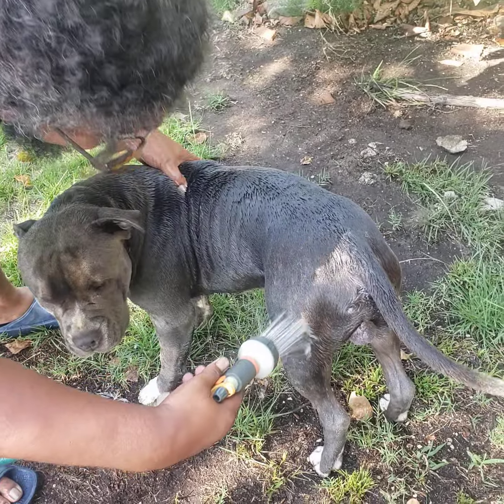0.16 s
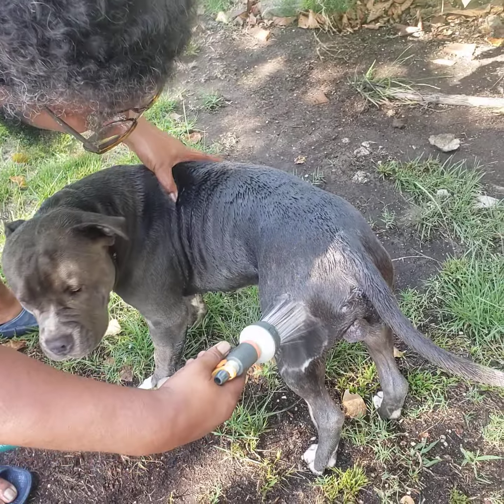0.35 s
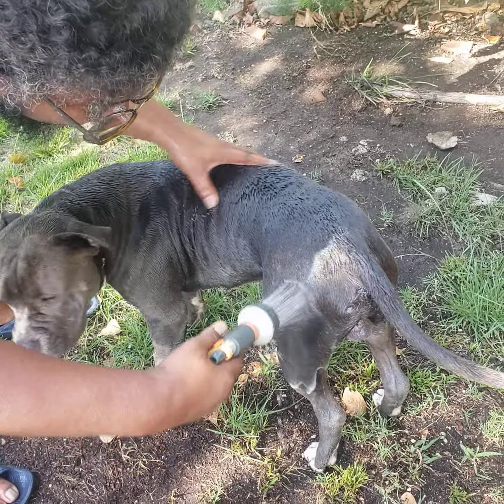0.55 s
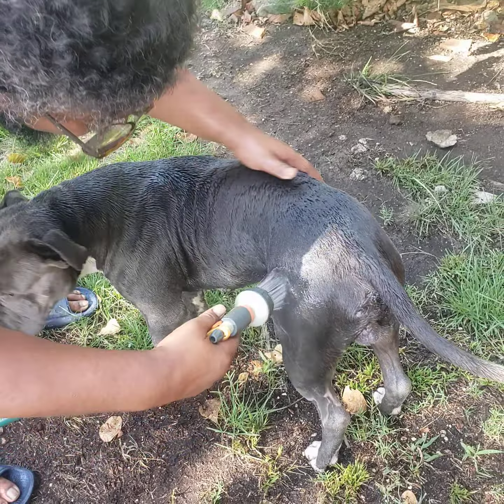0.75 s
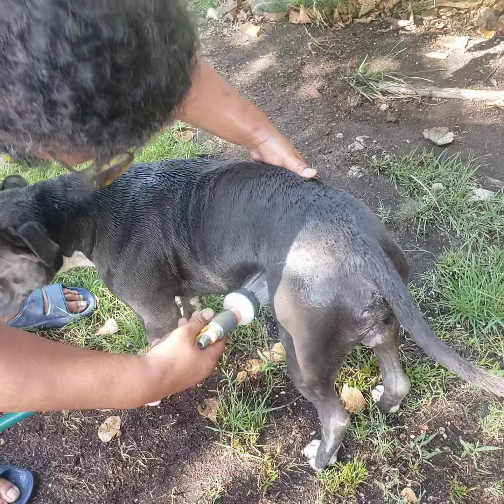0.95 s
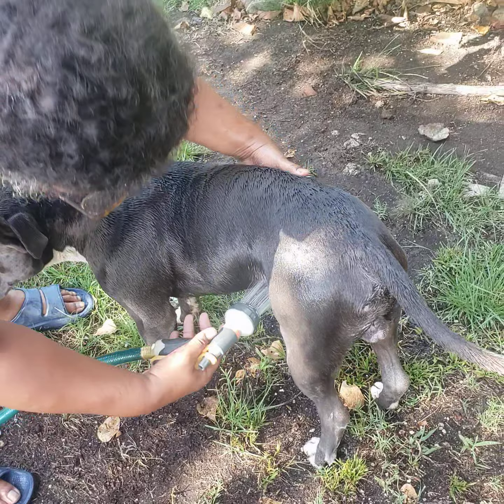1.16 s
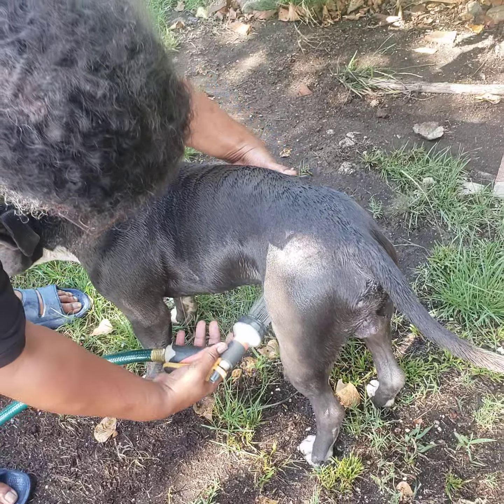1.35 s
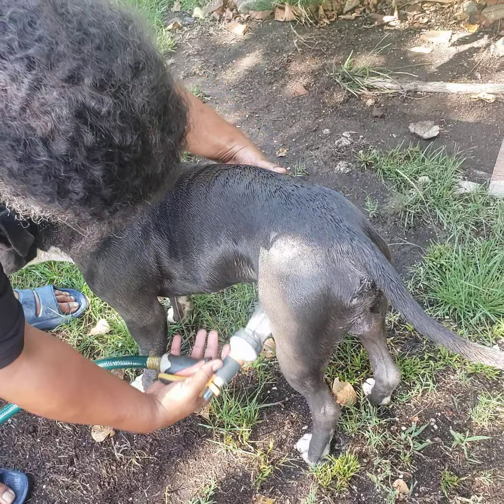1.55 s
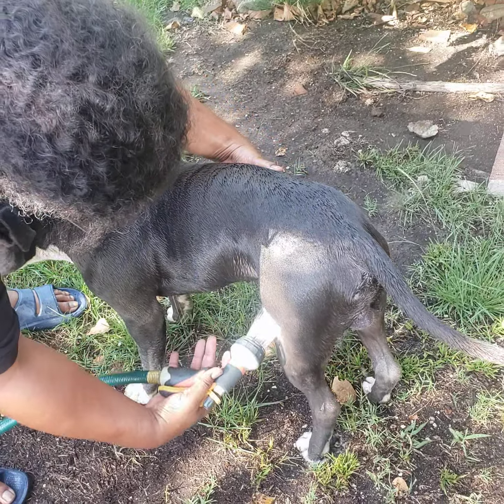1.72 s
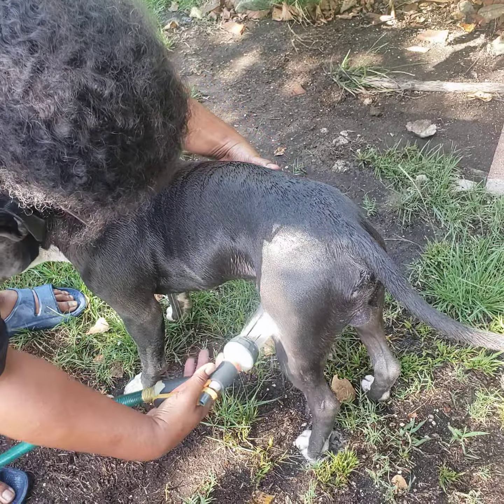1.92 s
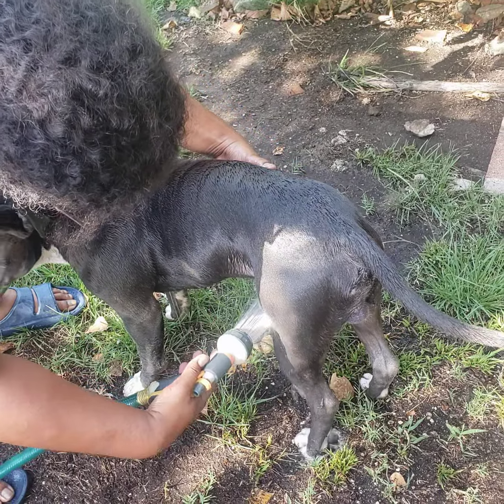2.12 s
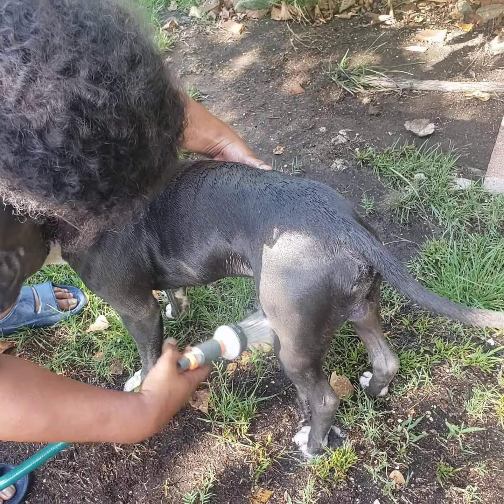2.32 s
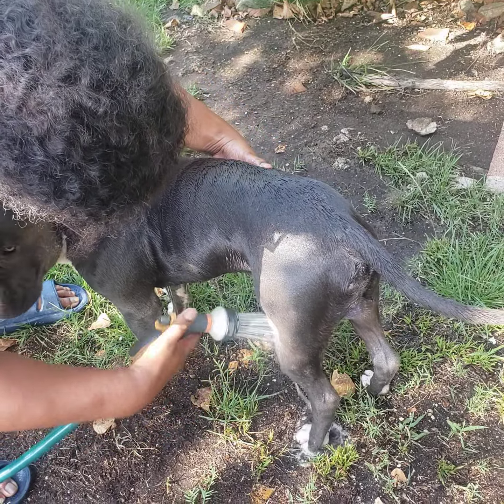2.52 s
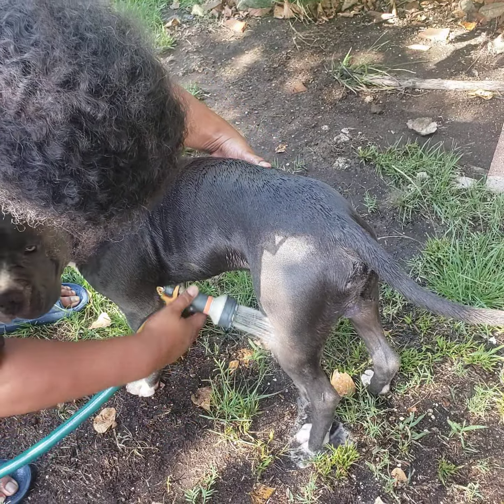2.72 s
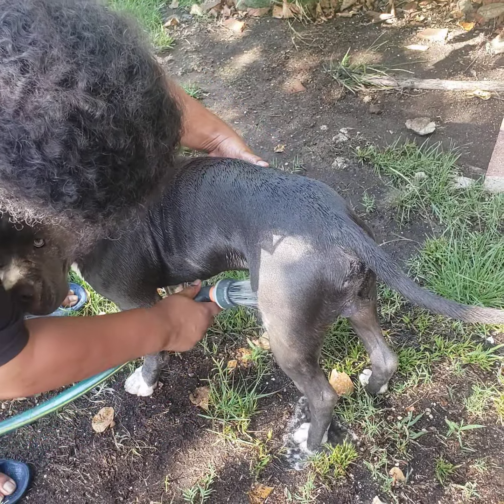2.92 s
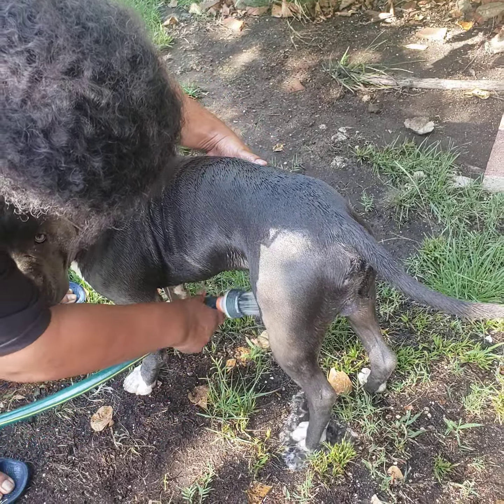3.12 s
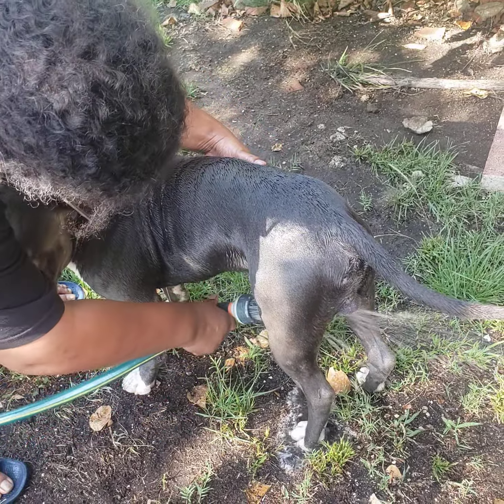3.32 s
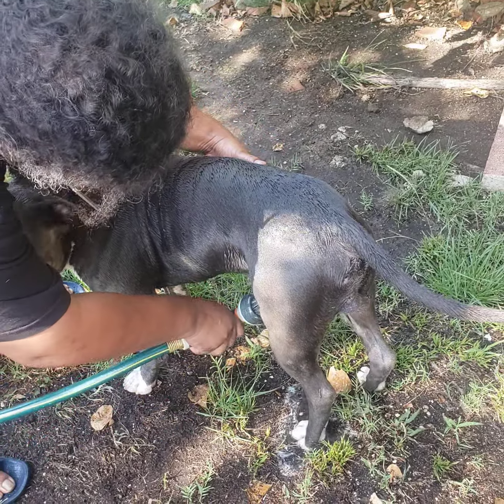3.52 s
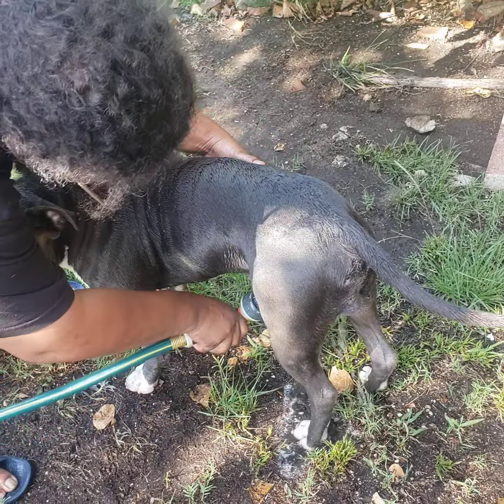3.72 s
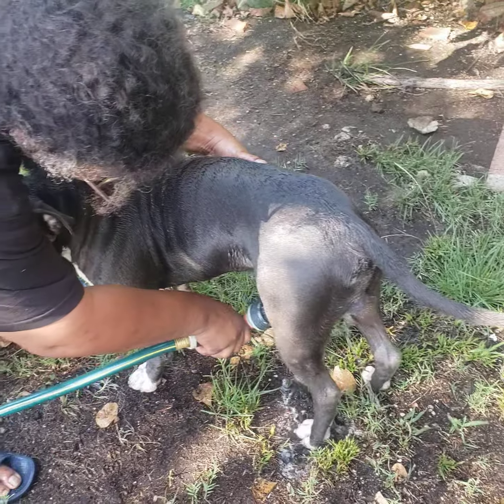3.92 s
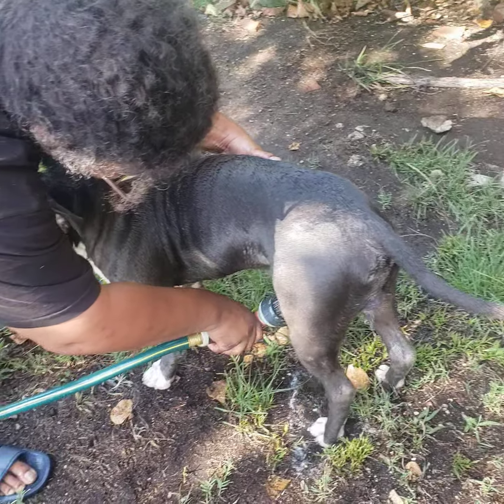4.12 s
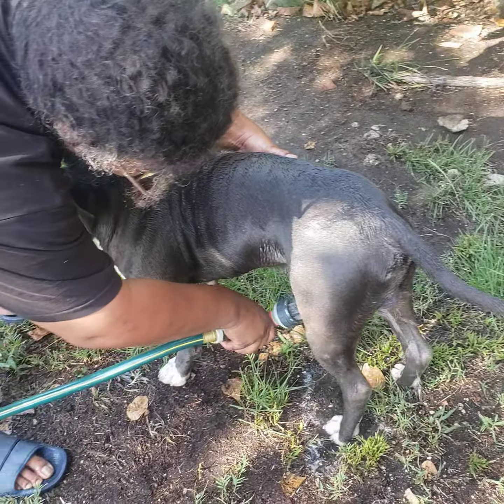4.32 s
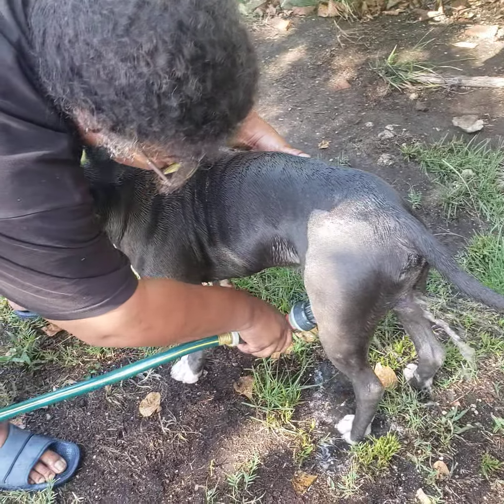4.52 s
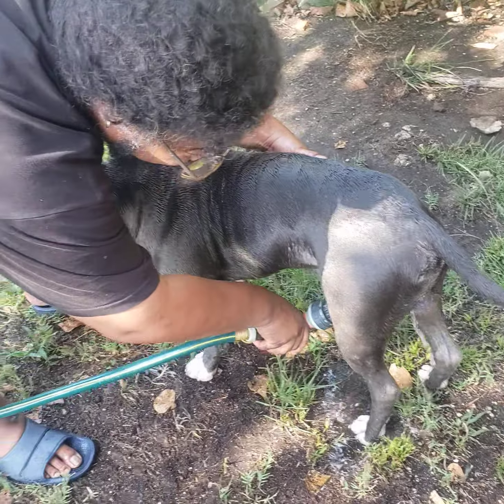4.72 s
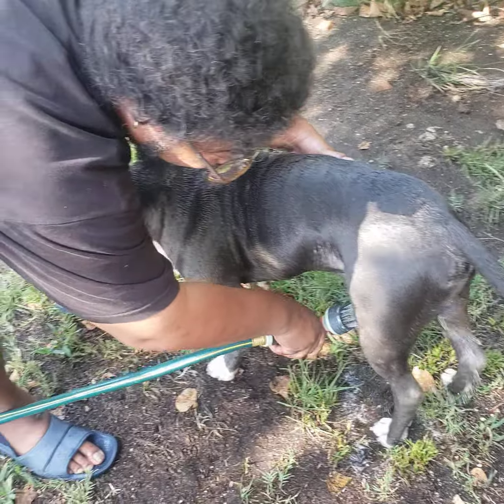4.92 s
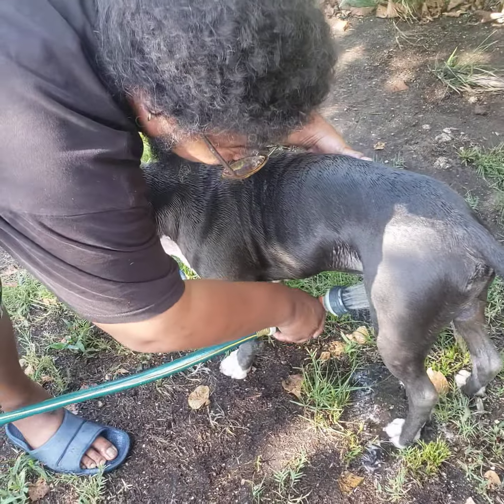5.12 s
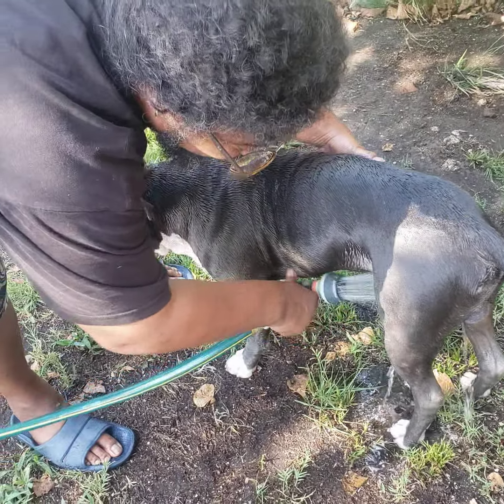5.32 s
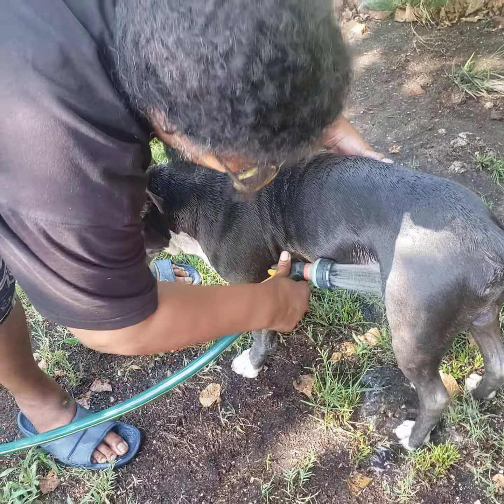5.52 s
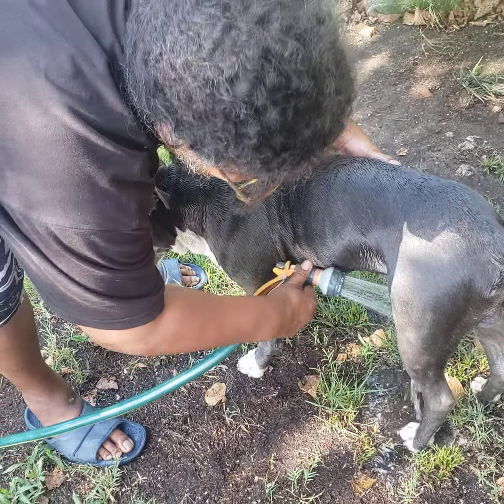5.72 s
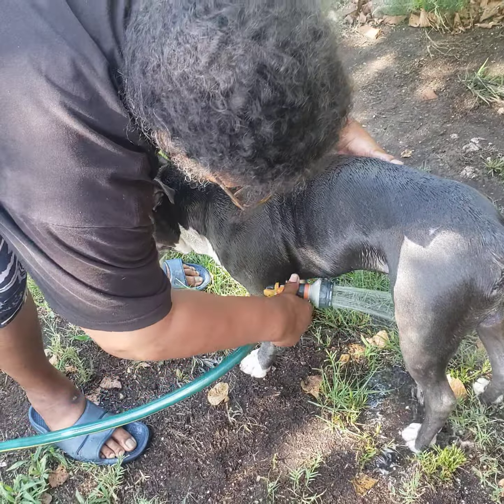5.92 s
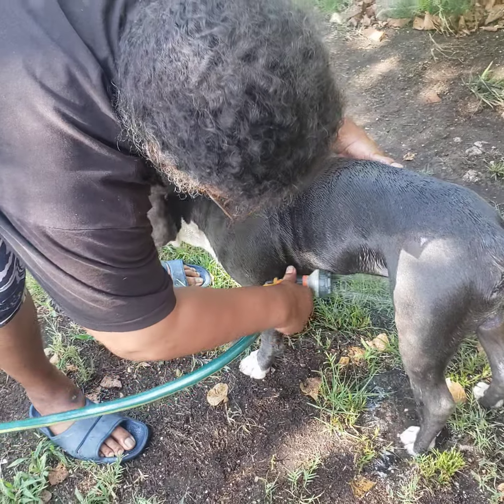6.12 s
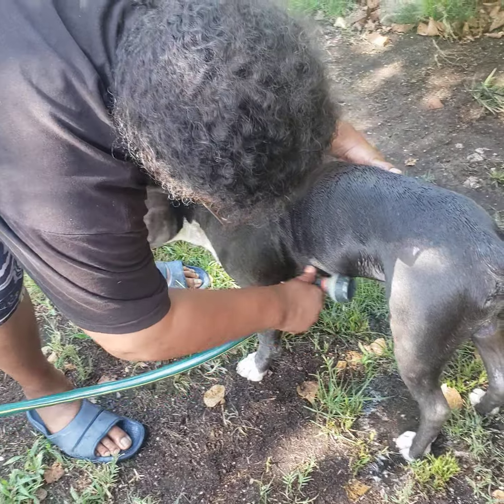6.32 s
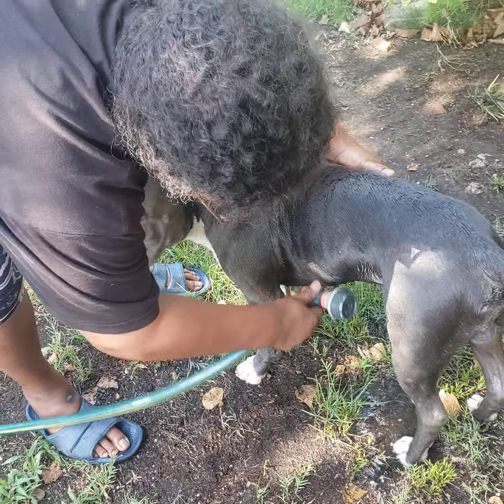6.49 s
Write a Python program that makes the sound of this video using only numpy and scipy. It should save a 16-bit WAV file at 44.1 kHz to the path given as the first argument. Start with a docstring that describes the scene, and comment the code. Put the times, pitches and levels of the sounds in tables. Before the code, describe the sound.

A garden hose nozzle sprays a dog in a yard, heard from about a metre above. Fine jets make a bright, steady hiss while drops splash on the wet coat and run-off patters on the soil. The spray swells and spits early on, eases, then builds a little again. Near the end the valve gives a brief squeak as it shuts and the hiss dies away. A faint low outdoor rumble lies underneath.

```python
"""A dog is rinsed with a garden nozzle in a yard; a two-port microphone is about a metre above it.
Fine jets sizzle from the start, and drops splash and drum on the wet coat over a low outdoor rumble.
Near 1.5 s the aim closes on the flank: the spray swells, the nozzle spits, run-off patters on the soil.
The spray eases by 3 s and builds again around 5 s. Just after 6 s the trigger is let go:
the valve's seal squeals briefly as it shuts, the hiss dies away and the hose gives a soft jolt."""
import sys
import numpy as np
from scipy import signal
from scipy.fft import rfft, irfft, next_fast_len
from scipy.io import wavfile
from scipy.ndimage import uniform_filter1d, map_coordinates

SR = 44100
rng = np.random.default_rng(int(sys.argv[2]) if len(sys.argv) > 2 else 0)


def put_to_file(sound):
    """Save the sound as 16-bit audio at rate SR, in the file named by the first command-line argument."""
    columns = np.atleast_2d(sound).T  # one column per channel
    safe = np.clip(columns, -1, 1)
    whole_steps = np.round(safe * 32767)
    wavfile.write(sys.argv[1], SR, whole_steps.astype(np.int16))


N = 289031
T = np.arange(N) / SR
SIZE = next_fast_len(N, real=True)
FREQS = np.maximum(np.arange(SIZE // 2 + 1) * SR / SIZE, 1)

# low outdoor rumble in the yard: time_s, level_db
RUMBLE_LEVELS = [(0, -54), (1.8, -55), (2.8, -54), (3.9, -55.5), (5.0, -51), (5.5, -51), (6.55, -53)]
# run-off on the soil below the dog: time_s, level_db
RUN_OFF_LEVELS = [(0.0, -76.5), (1.75, -64), (3.21, -73), (4.82, -68.5), (4.94, -59.5), (5.16, -64.5),
                  (5.8, -60.5), (6.55, -71)]
# heavy water hitting the flank: time_s, level_db
SPATTER_LEVELS = [(0, -76.5), (0.4, -68.5), (0.88, -68), (1.1, -81.5), (1.3, -93), (1.42, -63),
                  (1.58, -50.5), (1.88, -50), (2.25, -52.5), (2.55, -63.5), (2.9, -60.5), (3.1, -71),
                  (3.5, -78), (3.62, -68.5), (4.3, -70.5), (5.15, -68.5), (5.38, -59), (5.79, -63.5),
                  (5.93, -78.5), (6.05, -72)]
# the spray, louder as the aim nears the flank: time_s, mist_db, splash_db
SPRAY_LEVELS = [(0.0, -42.5, -55.5), (0.35, -41, -50), (0.6, -41.5, -54), (0.7, -45, -54.5),
                (1.18, -44.5, -52.5), (1.35, -42, -49), (1.5, -33, -40), (1.58, -28, -40),
                (1.68, -30.5, -39.5), (1.79, -30, -38.5), (1.88, -31, -38.5), (2.06, -35, -50),
                (2.18, -35.5, -46), (2.42, -38.5, -47.5), (2.55, -41.5, -50.5), (2.74, -43, -52),
                (2.88, -42, -49.5), (3.0, -43, -53.5), (3.22, -45, -56.5), (3.58, -45, -57.5),
                (4.05, -46.5, -56.5), (4.3, -44.5, -53.5), (5.3, -41, -45.5), (5.5, -38.5, -47),
                (5.76, -41.5, -47.5), (5.9, -44, -52.5), (6.12, -47.5, -53)]
# the jets' sizzle, changing with the aim: time_s, centre_hz, offset_from_mist_db
SIZZLE_BAND = [(0, 11800, 1), (0.55, 11960, 2), (0.92, 12200, 3), (1.25, 11800, -8), (1.85, 11740, -1),
               (2.1, 11960, -5.5), (2.35, 11540, -0.5), (2.48, 11600, -7), (2.62, 11470, 2.5),
               (2.8, 11300, -1.5), (3.1, 11900, -12.5), (4.1, 12000, -2.5), (4.4, 12200, -11),
               (4.9, 11100, -13), (5.1, 11960, 1.5), (5.4, 11860, 2), (5.6, 12030, 6), (5.76, 11900, 5),
               (5.85, 11760, 2), (6.0, 12000, 6), (6.12, 11800, 3)]
# the nozzle sweeps close past the leg and the gap rings out:
# time_s, rise_s, fall_s, centre_hz, glide_hz_per_s, width_hz, offset_from_splash_db
CLOSE_PASSES = [(1.47, 0.12, 0.23, 5030, 400, 706, -1), (1.8, 0.25, 0.36, 1770, -200, 750, -12.5),
                (2.2, 0.38, 0.31, 5180, -200, 1500, -2), (2.17, 0.44, 0.36, 1350, -130, 360, -11.5),
                (2.52, 0.043, 0.045, 4060, 0, 330, -0.5), (2.68, 0.13, 0.043, 4210, -2400, 617, 6),
                (2.69, 0.12, 0.12, 5520, 2200, 800, 1), (3.4, 0.13, 0.14, 4750, 0, 560, -7.5),
                (3.95, 0.25, 0.49, 4900, 0, 650, -5), (4.98, 0.39, 0.05, 4420, 0, 695, -7.5)]
# the jets playing on the soft body: start_s, end_s, first_pitch_hz, level_db
THRUMS = [(0.26, 1.55, 189.2, -61.5), (5.2, 6.063, 175, -62.5)]
# the body's resonances: pitch_multiple, gain_db
BODY_MODES = [(1, -1), (1.62, -7)]

# single fat splats on the coat: start_s, level_db, pitch_hz
SPLATS = [(0.445, -47, 2570), (1.3895, -54, 2930), (2.3252, -51, 2400), (2.469, -47, 2180),
          (2.662, -49, 3300), (2.9097, -44, 2300), (3.595, -53, 2800), (4.1351, -38.5, 3000),
          (4.1829, -45.5, 3230), (4.7617, -41.5, 2540), (5.3334, -46, 2280), (5.4347, -54, 2100)]
# short wet bursts: start_s, level_db
SOIL_SLAPS = [(1.91, -62), (2.215, -47), (2.299, -47), (2.494, -45), (4.923, -45.5), (5.434, -47)]
BRIGHT_DRIPS = [(5.5777, -31), (5.8094, -41), (5.917, -39.5), (6.4797, -58)]
NOZZLE_SPITS = [(1.558, -22), (1.8613, -24), (1.9107, -28), (2.1187, -31), (2.2654, -31), (6.452, -54)]

# flow noise in the valve, swelling as it narrows: time_s, level_db, pitch_hz
VALVE_FLOW = [(0, -69.5, 896), (2.0, -91, 855), (2.9, -69.5, 756), (4.3, -64, 881), (5.5, -62, 913),
              (6.0, -86, 890), (6.26, -60, 850), (6.35, -71, 865)]
# the valve's resonances: pitch_multiple, width_hz, gain_db
VALVE_MODES = [(1.003, 198, -1.5), (1.96, 260, -10)]
# the squeal's partials: harmonic, gain_db, growth_db_per_db, left_minus_right_db, left_lead_rad
SQUEAL_PARTIALS = [(1, 0, 1.05, -8, 0), (2, -6, 1.5, -9.5, 0.6), (3, -31, 1, 9.5, 2.2),
                   (4, -37.5, 2.5, 8, -1.5), (5, -23, 4, -11, 0)]
# nozzle resonances that lift overtones sliding through them: centre_hz, half_width_hz, lift_db
NOZZLE_MODES = [(1706, 55, 7.5), (2518, 31, 20)]

# the spectrum of each sound: frequency_hz, density_db
RUMBLE_SPECTRUM = [(20, -22), (35, -11), (50, -0.5), (65, -4.5), (77, 4), (92, -3.5), (125, -4.5),
                   (180, -16), (260, -15.5), (400, -31)]
SOIL_SPECTRUM = [(120, -3.5), (250, -1.5), (400, -2), (620, 1), (950, -4.5), (1300, -7.5), (1900, -15.5),
                 (2500, -24.5)]
SLAP_SPECTRUM = [(250, 0.5), (600, -19), (900, 5), (1300, 10), (1600, -22), (2400, -39)]
DRIP_SPECTRUM = [(3500, -27), (5000, 7), (6500, 6), (9000, -11), (14000, -9)]
DRUM_SPECTRUM = [(480, -14.5), (650, -12), (900, -14), (1120, -5.5), (1330, -9.5), (1550, -2), (1800, -4.5),
                 (2300, -25.5)]
SPATTER_SPECTRUM = [(1000, -18), (1600, -4.5), (2000, 2.5), (2600, -1), (3200, 0), (3700, -0.5),
                    (5000, -0.5)]
SPLASH_SPECTRUM = [(2500, -76), (3500, -25.5), (3900, -2.5), (4400, 0), (5200, -1), (6000, -1.5),
                   (6700, 1.5), (7500, -6.5), (8600, -9), (11000, -4)]
MIST_SPECTRUM = [(5500, -41), (7000, -12), (8300, -13.5), (9500, -7.5), (10500, -5.5), (11500, 0.5),
                 (12800, 0.5), (14200, 2.5), (15200, 2.5), (15800, 5.5), (16200, -38)]

# echo off the ground as the nozzle moves: time_s, delay_ms
GROUND_ECHO = [(0, 1.57), (0.7, 2.5), (1.4, 1.38), (2.5, 1.48), (2.9, 2.22), (4.0, 2.4), (6.2, 2.2)]
# echoes off flank, arm and legs: delay_ms, sway_ms, gain_db
NEAR_ECHOES = [(0.723, 0.077, -20), (1.118, 0.085, -14), (3.301, 0.15, -27), (5.2, 0.243, -12)]
# balance of the microphone's two ports: frequency_hz, left_minus_right_db
PORT_BALANCE = [(60, -1), (500, -0.5), (1100, 2), (1500, -1), (1900, 0.5), (3000, 3), (4400, -3.5),
                (5100, -9.5), (6300, -2.5), (8000, 3), (9500, -1), (11000, -1.5), (11900, -14.5),
                (13000, 4.5), (15700, 3.5)]
# how alike the ports sound: frequency_hz, coherence (0 to 1)
PORT_COHERENCE = [(200, 0.96), (700, 0.7), (1150, 0.54), (1550, 0.34), (1850, 0.32), (2800, 0.25),
                  (3500, 0.3), (3900, 0.1), (4750, 0.62), (5200, 0.092), (5750, 0.38), (6400, 0.24),
                  (8900, 0.21), (12000, 0.17), (16000, 0.1)]
# phase between the ports: frequency_hz, left_lead_rad
PORT_LEAD = [(200, 0.21), (900, -0.3), (1330, -1.96), (1650, -0.5), (2100, -0.7), (2500, -2.2),
             (3550, -2.5), (4000, -1.24), (4900, -3), (5350, -0.7), (5800, -0.6), (6400, -1.5),
             (7400, -0.4), (8100, -3.5), (9800, -2), (11300, -5), (13000, -3.5), (16000, -7)]

SHUT_S, SHUT_TIME_CONSTANT_S = 6.192, 0.072
MIST_FALL_DB, JETS_FALL_DB = 20.5, 25.5  # as the valve shuts
SQUEAL_START_S, SQUEAL_DB, SQUEAL_REST_HZ, SQUEAL_SAG_HZ = 6.112, -26.5, 892, 84
JUDDER_HZ, JUDDER_DEPTH, JUDDER_CREST_S = 31, 0.26, 6.155


def from_db(db):
    """Decibels to gain."""
    return 10 ** (np.asarray(db) / 20)


def unit_rms(x):
    """Scale to rms 1."""
    return x / np.sqrt(np.mean(x ** 2) + 1e-20)


def over_time(rows):
    """Each column of a timed table at every sample."""
    time_s, *columns = np.transpose(rows)
    return [np.interp(T, time_s, column) for column in columns]


def over_hz(points):
    """A table joined by straight lines in log frequency."""
    hz, value = np.transpose(points)
    return np.interp(np.log(FREQS), np.log(hz), value)


def colour(x, spectrum):
    """Filter by a spectrum that falls away steeply beyond its ends; rms 1."""
    skirts = np.minimum(1, np.minimum(FREQS / spectrum[0][0], spectrum[-1][0] / FREQS)) ** 4
    return unit_rms(irfft(rfft(x, SIZE) * from_db(over_hz(spectrum)) * skirts, SIZE)[..., :N])


def drift(rate_hz):
    """A slow random wander with rms near 1."""
    pole = np.exp(-80 * np.pi * rate_hz / SR)  # one step every 40 samples
    slow = signal.lfilter([1], [1, -2 * pole, pole * pole], rng.standard_normal(N // 40 + 2002))[2000:]
    return np.interp(np.arange(N) / 40, np.arange(len(slow)), unit_rms(slow))


def drops(per_s, spread_db, clump_db, wash):
    """Impacts of uneven size, arriving in clumps over a smooth wash of finer drops; rms 1."""
    lands = rng.random(N) < per_s / SR
    sizes = from_db(spread_db * np.minimum(rng.exponential(1, N), 3.5))
    impacts = unit_rms(lands * sizes * rng.uniform(-1.22, 1, (2, N)))
    return unit_rms((impacts + wash * rng.standard_normal((2, N))) * from_db(clump_db * drift(15)))


def resonate(x, hz, width_hz):
    """A resonance, applied twice, whose centre may move; rms 1."""
    carrier = np.exp(2j * np.pi * np.cumsum(hz * np.ones(N)) / SR)
    pole = np.exp(-np.pi * width_hz / SR)
    ringing = signal.lfilter([1], [1, -2 * pole, pole * pole], x * carrier.conj())
    return unit_rms(np.real(carrier * ringing))


def plip(clicks, hz, cycles):
    """Each click rings like a drop, dying by 60 dB over the given cycles."""
    pole, angle = from_db(-60 * hz / (cycles * SR)), 2 * np.pi * hz / SR
    return signal.lfilter([.5, 0, -.5], [1, -2 * pole * np.cos(angle), pole * pole], clicks + 1e-18)


def bursts(rows, t60_s, spectrum):
    """Wet bursts of noise that start at once and die fast."""
    envelope = sum(from_db(db - 60 * np.abs(T - start) / t60_s) * (T >= start) for start, db in rows)
    return envelope * colour(rng.standard_normal((2, N)), spectrum)


def shut_off():
    """How far the flow has died once the trigger is let go, 0 to 1: fast at first, then a dribble."""
    return 1 - np.exp(-np.maximum(T - SHUT_S, 0) / SHUT_TIME_CONSTANT_S)


def rumble(swing_db=1.9):
    """The yard's low, uneven background."""
    level_db, = over_time(RUMBLE_LEVELS)
    gain = from_db(level_db + swing_db * drift(7.7))
    return gain * colour(rng.standard_normal((2, N)), RUMBLE_SPECTRUM)


def yard(x, tail_db=-20, t60_s=0.21):
    """The yard adds a faint, diffuse tail to a sound."""
    t = T[:SR // 2]
    tail = rng.standard_normal((2, len(t))) * from_db(-60 * t / t60_s)
    tail /= np.sqrt(np.sum(tail ** 2, axis=1, keepdims=True))
    return x + from_db(tail_db) * signal.fftconvolve(x, tail, axes=1)[:, :N]


def reflections(x):
    """Echoes off nearby surfaces shift as the hand moves, so the hiss swishes."""
    ground_ms, = over_time(GROUND_ECHO)
    paths = [(ground_ms + 0.083 * drift(1.54), -14.5)]
    paths += [(ms + sway_ms * drift(0.53), db) for ms, sway_ms, db in NEAR_ECHOES]
    return x + sum(from_db(db) * np.array([np.interp(T - ms / 1000, T, side, left=0) for side in x])
                   for ms, db in paths)


def hose_jolt(peak_s=6.39, half_width_s=0.054, level_db=-54.5):
    """The hose gives a soft, low thud once the flow has stopped."""
    swell = np.exp(-((T - peak_s) / half_width_s) ** 2)
    return from_db(level_db) * swell * colour(rng.standard_normal((2, N)), RUMBLE_SPECTRUM)


def valve_flow():
    """Turbulence rings faintly in the open valve."""
    level_db, pitch_hz = over_time(VALVE_FLOW)
    turbulence = rng.standard_normal((2, N))
    return from_db(level_db) * sum(from_db(db) * resonate(turbulence, multiple * pitch_hz, width_hz)
                                   for multiple, width_hz, db in VALVE_MODES)


def run_off():
    """Water runs off the dog and patters on the soil."""
    level_db, = over_time(RUN_OFF_LEVELS)
    patter = drops(per_s=980, spread_db=0, clump_db=1.5, wash=1)
    return from_db(level_db + 3.5) * colour(patter, SOIL_SPECTRUM)


def body_thrum(sag_hz_per_s=70.4, fade_s=0.075):
    """The jets set the soft body thrumming; the pitch sinks as they move along it."""
    out = 0
    for start, end, first_hz, db in THRUMS:
        envelope = np.clip(np.minimum(T - start, end - T) / fade_s + .5, 0, 1)
        pitch_hz = first_hz - sag_hz_per_s * (np.clip(T, start, end) - start)
        pelting = rng.standard_normal((2, N))
        for multiple, mode_db in BODY_MODES:
            out += envelope * from_db(db + mode_db) * resonate(pelting, multiple * pitch_hz, width_hz=35)
    return out


def fat_drops(per_s=260, spread_db=7.5, low_hz=1376, high_hz=4450):
    """Big drops of uneven size, each ringing at one of ten pitches; rms 1."""
    pitches = np.geomspace(low_hz, high_hz, 10)
    lands = rng.random(N) < per_s / SR
    clicks = lands * from_db(spread_db * rng.random(N)) * rng.uniform(-0.93, 1, (2, N))
    pitch_index = rng.integers(0, len(pitches), N)
    return unit_rms(sum(plip(clicks * (pitch_index == k), hz, cycles=20) for k, hz in enumerate(pitches)))


def flank_spatter():
    """Heavy drops spatter on the flank; its drumming grows with them from a steady floor."""
    spatter_db = over_time(SPATTER_LEVELS)[0] - JETS_FALL_DB * shut_off()
    fine = colour(drops(per_s=1400, spread_db=0.5, clump_db=2.3, wash=0.88), SPATTER_SPECTRUM)
    spatter = from_db(spatter_db) * (fine + from_db(-6) * fat_drops())
    drum_gain = np.hypot(from_db(-62.5 + 0.92 * (spatter_db + 60)), from_db(-73.5))
    drum = colour(drops(per_s=990, spread_db=-1, clump_db=2.1, wash=1), DRUM_SPECTRUM)
    return spatter + drum_gain * drum


def splats(droplets=9, gap_s=0.0023, loss_db=0.7):
    """A fat drop lands on the coat and throws droplets, ever weaker, that ring around its pitch."""
    out, length = np.zeros((2, N)), int(.1 * SR)
    for start_s, db, pitch_hz in SPLATS:
        start = int(start_s * SR)
        for k in range(droplets):
            click = np.zeros((2, length))
            click[:, int(k * gap_s * rng.uniform(.7, 1.3) * SR)] = rng.choice([-1, 1], 2)
            droplet = plip(click, pitch_hz * 2 ** rng.uniform(-.5, 0.62), cycles=11)
            out[:, start:start + length] += from_db(db - loss_db * k) * droplet
    return out


def wet_bursts():
    """Gouts of run-off slap the soil, single drops land brightly and the nozzle spits."""
    slaps = from_db(-3.5) * bursts(SOIL_SLAPS, t60_s=0.062, spectrum=SLAP_SPECTRUM)
    drips = from_db(-3) * bursts(BRIGHT_DRIPS, t60_s=0.029, spectrum=DRIP_SPECTRUM)
    spits = bursts(NOZZLE_SPITS, t60_s=0.023, spectrum=MIST_SPECTRUM)
    return slaps + drips + spits


def valve_squeal(seal_lag_s=.008, flutter_db=.25, nozzle_build_s=.016):
    """The nearly shut seal oscillates and judders; a wider swing lowers the pitch and adds overtones."""
    # the drive creeps up, jumps to its peak, sinks while held, and dies
    corners_s = SQUEAL_START_S + np.cumsum([0, 0.023, 0.0097, 0.048, 0.051])
    drive = np.interp(T, corners_s, [0, 0.18, 1, 0.79, 0])
    drive *= 1 - JUDDER_DEPTH * np.sin(np.pi * JUDDER_HZ * (T - JUDDER_CREST_S)) ** 2
    swing = np.abs(uniform_filter1d(drive, size=int(seal_lag_s * SR))) * from_db(flutter_db * drift(41))
    jitter = 1 + .003 * drift(200)
    pitch_hz = SQUEAL_REST_HZ - SQUEAL_SAG_HZ * swing
    phase = 2 * np.pi * np.cumsum(pitch_hz * jitter) / SR
    out = 0
    for harmonic, db, growth, pan_db, lead_rad in SQUEAL_PARTIALS:
        pan = from_db(pan_db / 2 * np.array([[1], [-1]]))
        lift_db = sum(peak_db / (1 + ((harmonic * pitch_hz - hz) / half_width_hz) ** 2)
                      for hz, half_width_hz, peak_db in NOZZLE_MODES)
        lift_db = uniform_filter1d(lift_db, size=int(nozzle_build_s * SR))
        flicker_db = 0.12 * harmonic ** 2 * drift(54)
        gain = from_db(SQUEAL_DB + db + lift_db + flicker_db) * swing ** growth
        out += pan / pan.mean() * gain * np.cos(harmonic * phase + np.array([[lead_rad], [0]]))
    return np.sqrt(2) * yard(out)


def hollow_ring(gap_hz=5300, wander_hz=200):
    """The gap between nozzle and dog favours one band of the splash; close passes ring out more bands."""
    water = drops(per_s=2900, spread_db=2, clump_db=2.1, wash=0.47)
    out = from_db(-11.5) * resonate(water, gap_hz + wander_hz * drift(2.4), width_hz=900)
    close_water = drops(per_s=2200, spread_db=1, clump_db=0.5, wash=0.45)
    for time_s, rise_s, fall_s, hz, glide_hz_per_s, width_hz, db in CLOSE_PASSES:
        nearness = np.exp(-((T - time_s) / np.where(T < time_s, rise_s, fall_s)) ** 2)
        centre_hz = hz + glide_hz_per_s * np.clip(T - time_s, -2 * rise_s, 2 * fall_s)
        out += from_db(db) * nearness * resonate(close_water, centre_hz, width_hz)
    return out


def fur_scatter(x, depth_db=2.5, patch_hz=330.9, changes_per_s=6):
    """As the jets cross the coat, narrow bands of the hiss swell and fade, each on its own."""
    hz, time_s, spectra = signal.stft(x, SR, nperseg=1024)
    patches = rng.standard_normal((256, 256))
    places = np.meshgrid(hz / patch_hz, time_s * changes_per_s, indexing="ij")
    gain = unit_rms(from_db(depth_db * map_coordinates(patches, places, order=1, mode="mirror")))
    return signal.istft(spectra * gain, SR)[1][:, :N]


def spray():
    """Fine jets sizzle in a narrow band, break into mist and splash on the coat."""
    mist_db, splash_db = over_time(SPRAY_LEVELS)
    sizzle_hz, sizzle_db = over_time(SIZZLE_BAND)
    mist_drops = drops(per_s=13000, spread_db=1.5, clump_db=1, wash=0.9)
    jet_drops = drops(per_s=6400, spread_db=0.5, clump_db=0.5, wash=0.68)
    coat_drops = drops(per_s=3500, spread_db=0, clump_db=1.56, wash=0.92)
    mist = from_db(mist_db + 1.45) * colour(mist_drops, MIST_SPECTRUM)
    sizzle = from_db(mist_db + sizzle_db) * resonate(jet_drops, sizzle_hz, width_hz=950)
    splash = from_db(splash_db - 0.5) * colour(coat_drops, SPLASH_SPECTRUM)
    jets = sizzle + splash + from_db(splash_db) * hollow_ring()
    return from_db(-MIST_FALL_DB * shut_off()) * mist + from_db(-JETS_FALL_DB * shut_off()) * jets


def microphone_ports(x):
    """Two unrelated signals become left and right: alike in the bass, each with its colour and delay."""
    coherence = np.clip(over_hz(PORT_COHERENCE), 0, .99)
    lean, lead_rad = from_db(over_hz(PORT_BALANCE) / 2), over_hz(PORT_LEAD)
    mid, side = rfft(x, SIZE) * np.sqrt([1 + coherence, 1 - coherence])
    left = (mid + side) * lean * np.exp(1j * lead_rad)
    right = (mid - side) / lean
    centre_gain = np.sqrt((lean ** 2 + lean ** -2 + 2 * coherence * np.cos(lead_rad)) / 2)
    return irfft(np.array([left, right]) / centre_gain, SIZE)[:, :N]


def scene():
    """A metre above the dog, water and air reach the microphone from all round, the squeal from a point."""
    water = reflections(fur_scatter(spray()) + flank_spatter() + run_off() + body_thrum())
    all_round = water + wet_bursts() + splats() + valve_flow() + hose_jolt() + rumble()
    return microphone_ports(all_round) + valve_squeal()


def record(dry):
    """The top is cut steeply above 15850 Hz."""
    return signal.sosfilt(signal.ellip(12, .1, 80, 15850, fs=SR, output="sos"), dry)


dry = scene()
out = record(dry)
put_to_file(out)
```